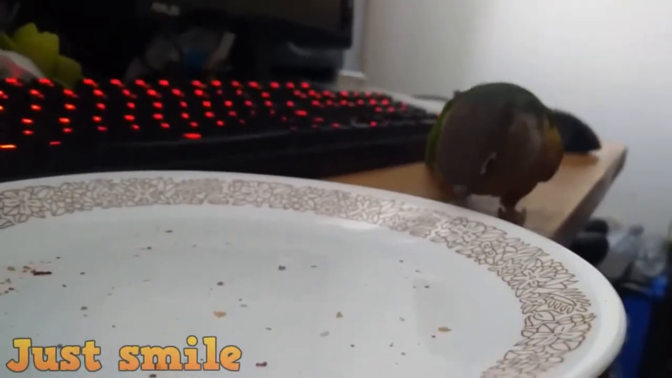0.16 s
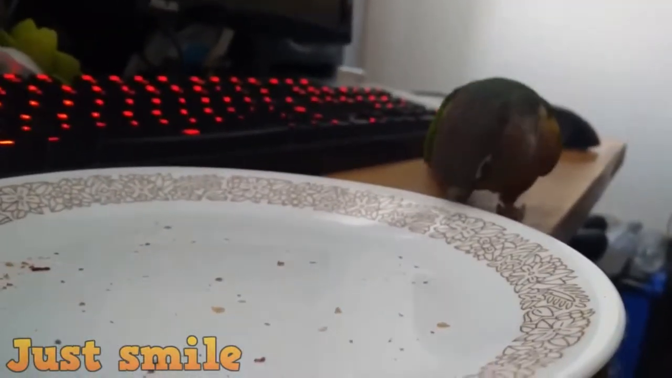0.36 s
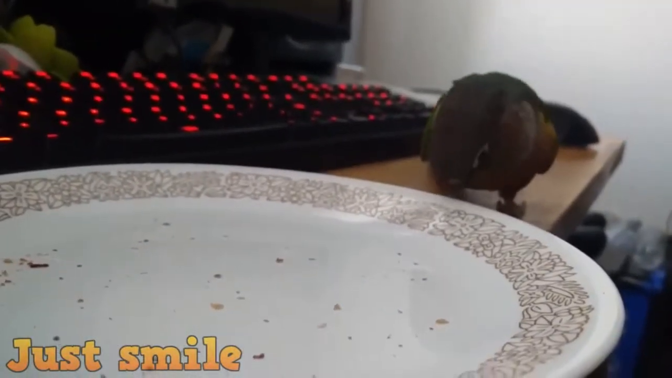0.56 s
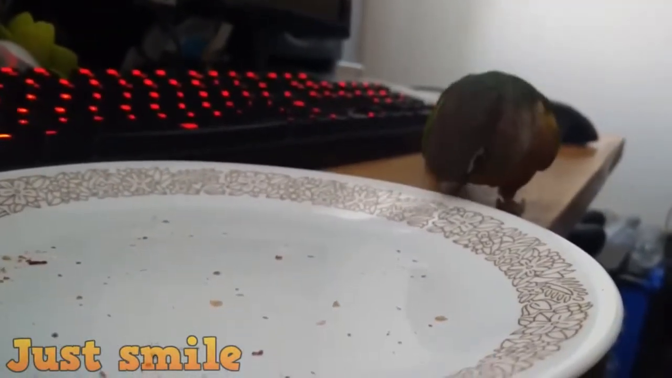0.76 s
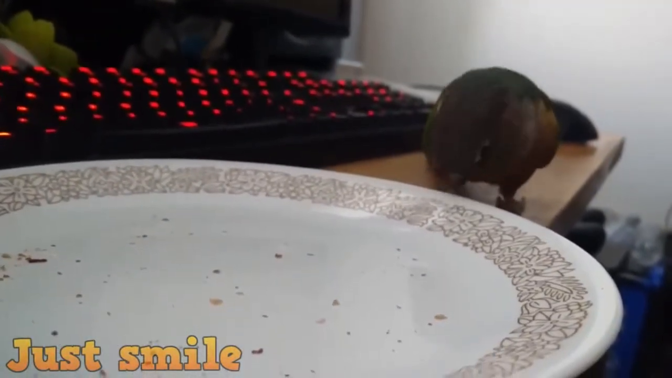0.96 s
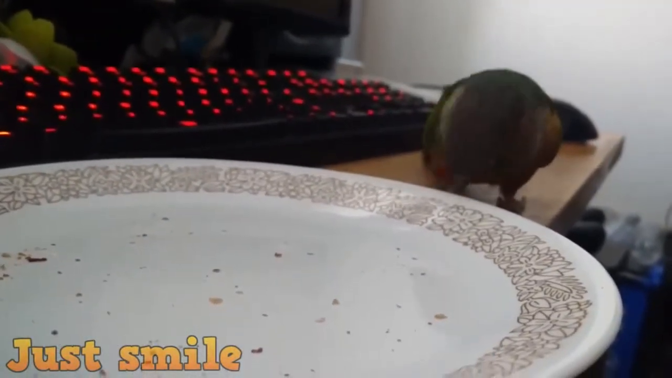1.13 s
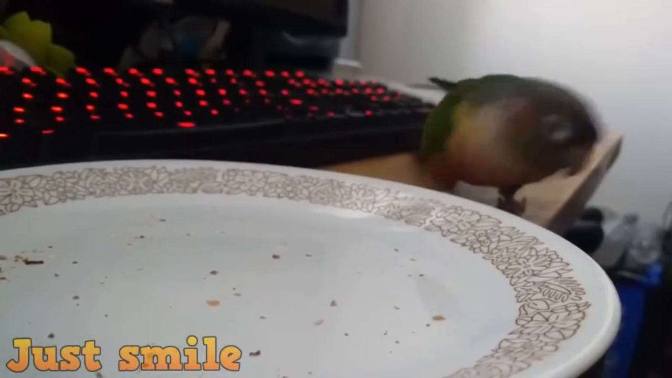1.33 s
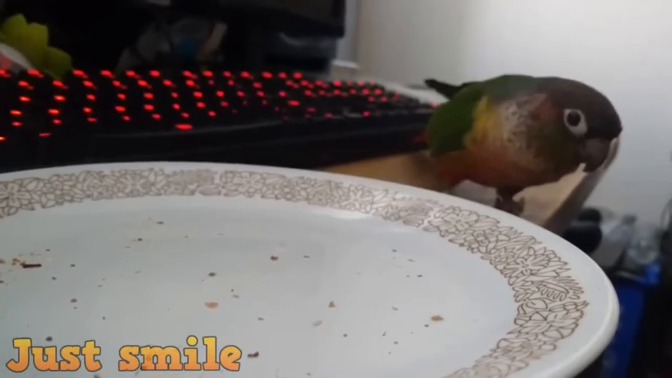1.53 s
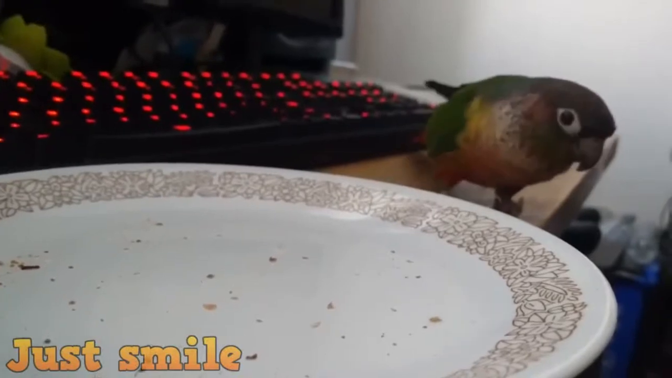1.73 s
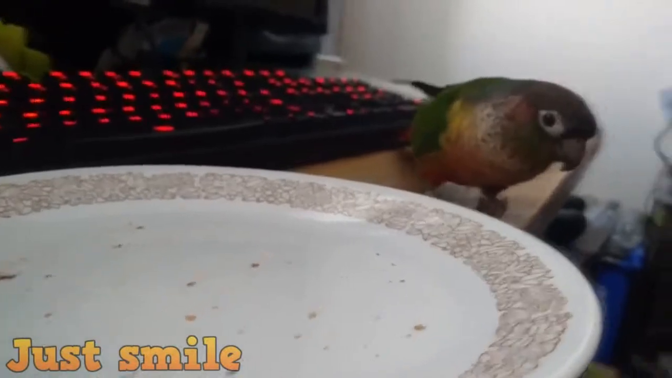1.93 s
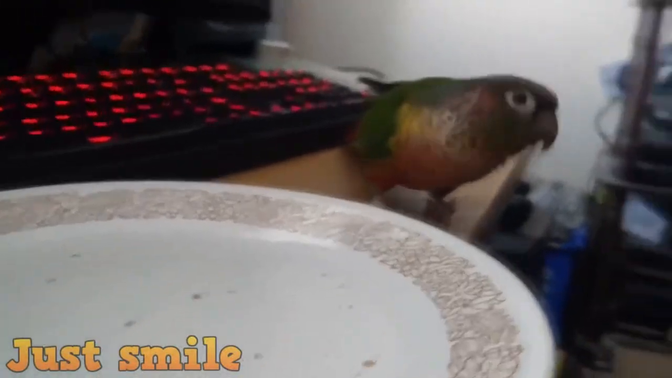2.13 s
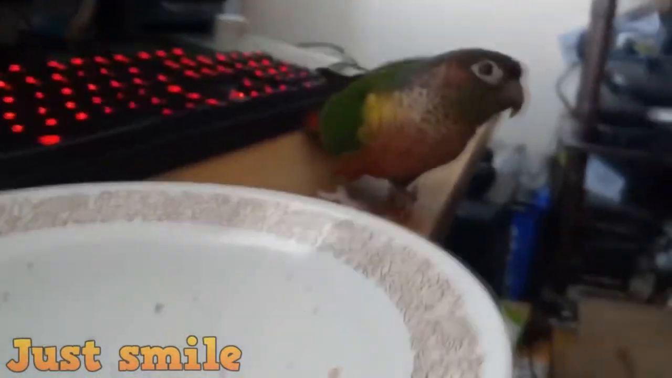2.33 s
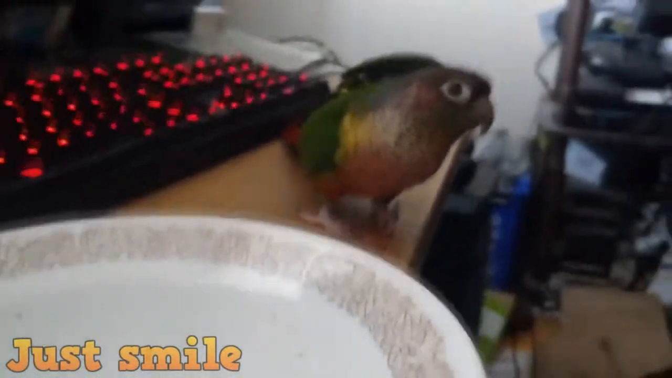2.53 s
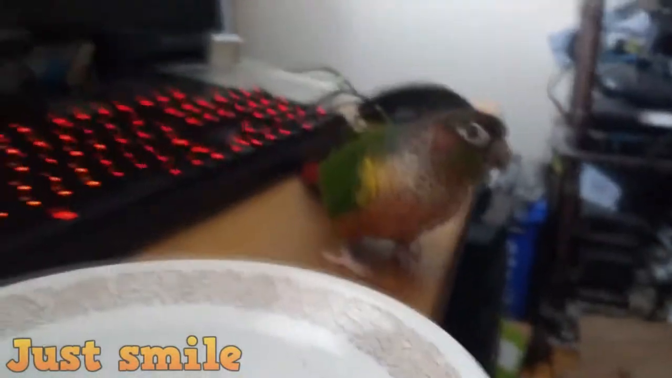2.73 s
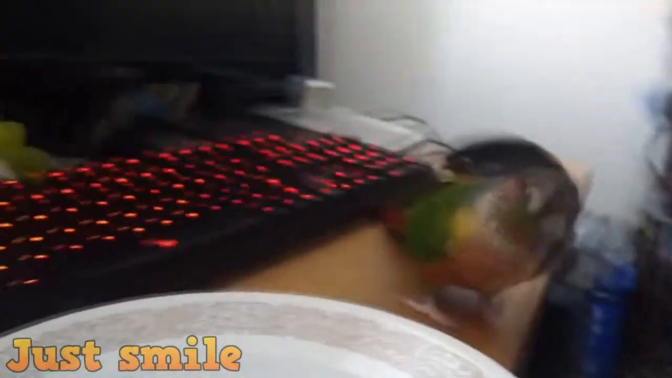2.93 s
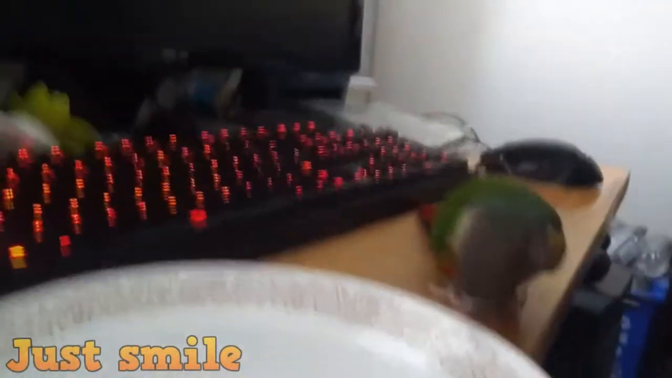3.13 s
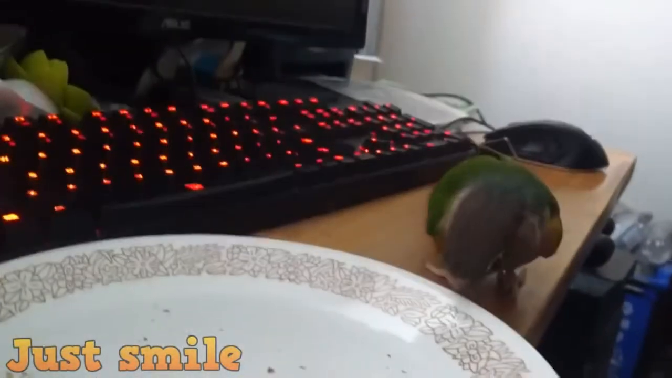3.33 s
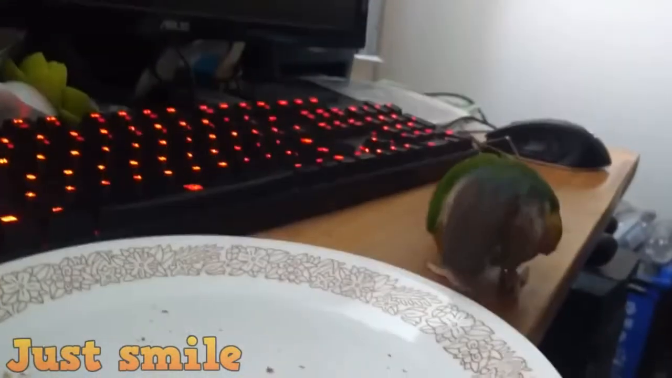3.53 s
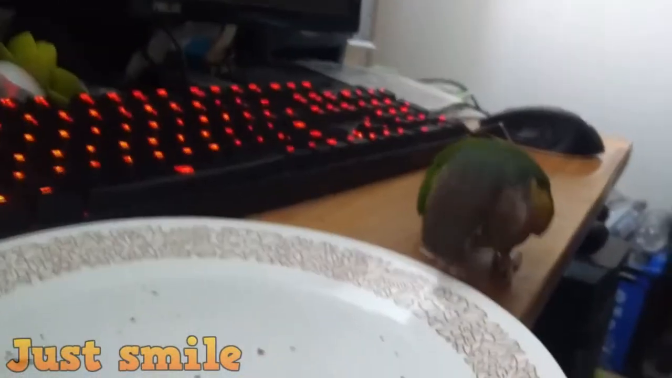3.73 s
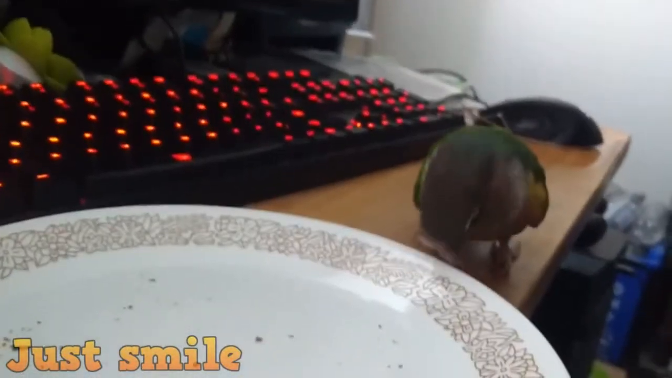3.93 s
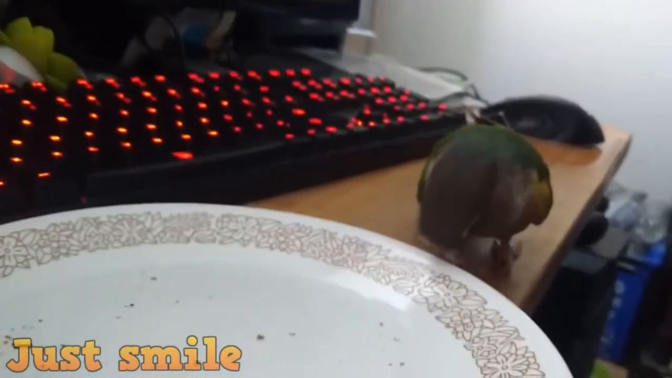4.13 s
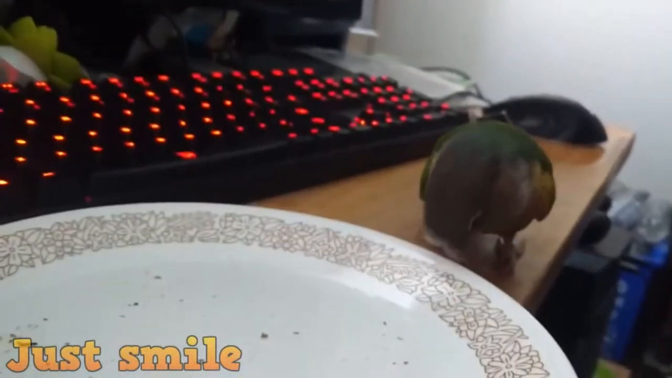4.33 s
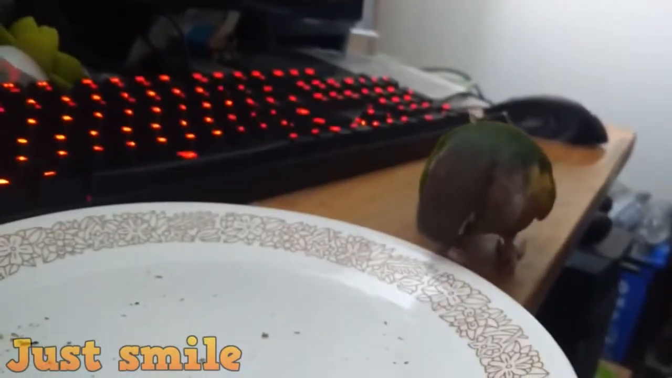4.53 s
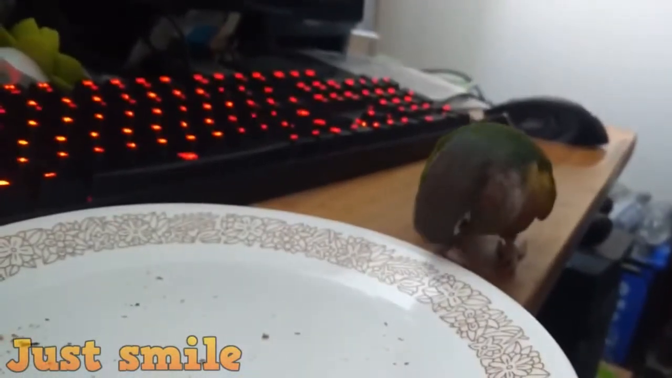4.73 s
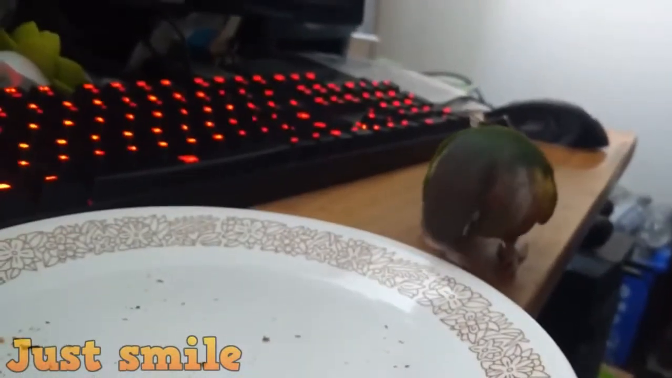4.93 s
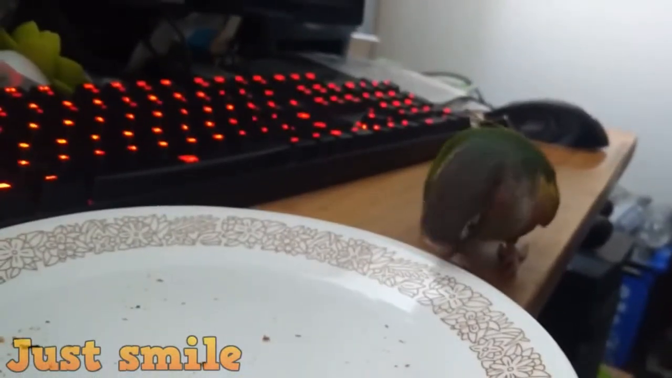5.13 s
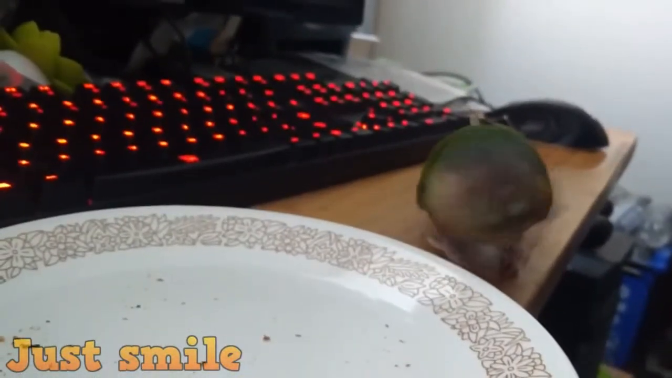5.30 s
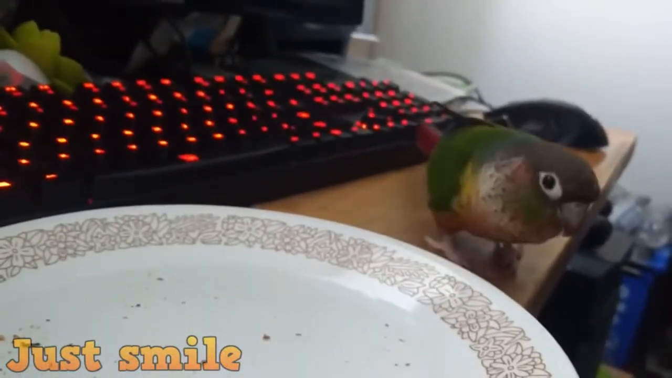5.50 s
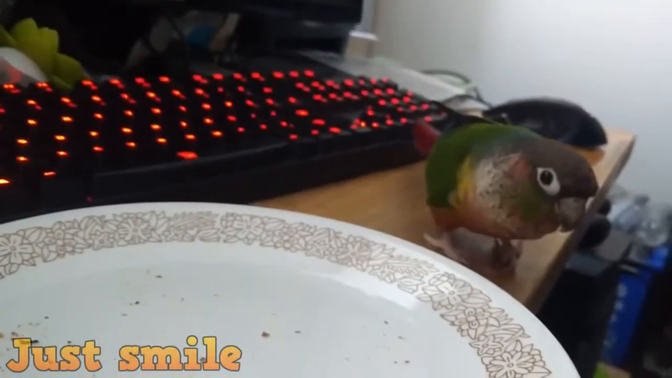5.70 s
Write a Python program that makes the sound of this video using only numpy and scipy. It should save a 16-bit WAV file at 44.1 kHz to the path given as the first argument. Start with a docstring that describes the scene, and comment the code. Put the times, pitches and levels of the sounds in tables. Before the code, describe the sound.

A small parrot raps its beak on a ceramic plate right beside the microphone, about seven taps a second. Each tap is a dry click with a piercing ping and a longer, lower ring. After a pause of about two seconds, a second, longer run starts softly and grows loud. Computer fans hum throughout in the small room, with rushing air, a low rumble and faint hiss.

```python
"""A small parrot raps its beak on a ceramic plate in two runs, right beside the microphone.
Each rap is a dry click with a short, bright splash, a piercing 6 kHz ping and the plate's longer,
lower ring, whose tones change in loudness from rap to rap. The pings overload the recorder's limiter.
Behind it, a computer's fans hum in the small room over rushing air, a low rumble and a faint hiss."""
import sys
import numpy as np
from scipy import signal
from scipy.fft import rfft, irfft
from scipy.io import wavfile
from scipy.ndimage import uniform_filter1d, minimum_filter1d

SR = 44100
rng = np.random.default_rng(int(sys.argv[2]) if len(sys.argv) > 2 else 0)


def generate_wav(sig):
    """Save sig (samples, or channels by samples) to the path in sys.argv[1] as 16-bit PCM at SR."""
    pcm = np.round(np.clip(np.atleast_2d(sig).T, -1, 1) * 32767).astype(np.int16)
    wavfile.write(sys.argv[1], SR, pcm)


N = 254016
TIME = np.arange(N) / SR


def amp(db):
    """Decibels to gain."""
    return 10 ** (np.asarray(db) / 20)


def fade(t, t60):
    """An exponential decay, 60 dB down after t60 seconds."""
    return np.exp(-np.log(1000) * t / t60)


def curve_at(points, hz):
    """Reads a curve on a logarithmic frequency axis."""
    corner_hz, value = np.transpose(points)
    return np.interp(np.log(hz + 1), np.log(corner_hz + 1), value)


def low_cut(hz, order):
    """A Butterworth high-pass filter."""
    return signal.butter(order, hz, "high", fs=SR, output="sos")


def add(mix, start_s, sound):
    """Lays a sound into the mix at a time."""
    part = mix[round(start_s * SR):][:len(sound)]
    part += sound[:len(part)]


def noise(spectrum, size=N):
    """Noise of unit rms, coloured by a spectrum."""
    gain = amp(curve_at(spectrum, np.fft.rfftfreq(size, 1 / SR)))
    coloured = irfft(rfft(rng.standard_normal(size)) * gain, size)
    return coloured / np.sqrt(np.mean(coloured ** 2) + 1e-20)


# Level ride of the hiss, which drops as the microphone turns: (time [s], level [dB])
HISS_RIDE = [(0, -59), (1.5, -64), (2.1, -64), (2.5, -73), (5.7, -67)]

def hiss():
    """A faint, airy band of hiss, brightest near 9.5 kHz."""
    band = noise([(2000, -25), (6000, -7), (9500, 10), (13000, -22)])
    return amp(np.interp(TIME, *np.transpose(HISS_RIDE))) * band


# Colour of the computer's low rumble: (frequency [Hz], relative level [dB])
RUMBLE_SPECTRUM = [(20, -11.5), (42, -34), (57, 2), (75, 2), (87, 4), (105, -4.5), (130, 2), (155, -9.5),
                   (300, -6.5), (600, -32)]
# Colour of the moving air: (frequency [Hz], relative level [dB])
AIR_SPECTRUM = [(150, -12), (260, -1), (400, -3), (850, -6), (1100, -2.5), (1380, -8.5), (1700, -4.5),
                (2100, -8.5), (3400, -8), (4300, -14.5), (5500, -14), (7000, -19), (11000, -35),
                (15500, -44)]
# Level ride of the air as the microphone turns: (time [s], level [dB])
AIR_RIDE = [(0, -44), (1.4, -45), (2.2, -45), (2.7, -47), (5.7, -47)]
# The fans' hum: (frequency [Hz], centre rms level [dB])
FAN_TONES = [(118.4, -54.5), (258.4, -62.5), (425.3, -62.5), (479.1, -55), (511.4, -58), (769.8, -62.5),
             (1026, -66), (1540, -64), (1653, -61)]

def computer(rumble_db=-47, waver_hz=0.69, throb_db=2):
    """The bed: fan tones waver in pitch and level over rushing air and a low rumble."""
    out = amp(rumble_db) * noise(RUMBLE_SPECTRUM)
    out += amp(np.interp(TIME, *np.transpose(AIR_RIDE))) * noise(AIR_SPECTRUM)
    slow = [(4, 0), (40, -60), (200, -150)]
    for hz, db in FAN_TONES:
        drift, throb = noise(slow), noise(slow)
        cycles = np.cumsum(hz + waver_hz * drift) / SR + rng.random()
        out += amp(db + throb_db * throb) * np.sqrt(2) * np.sin(2 * np.pi * cycles)
    return out


# Decay of the small room: (frequency [Hz], t60 [s])
ROOM_DECAY = [(200, 0.84), (2000, 0.25), (6000, 0.19), (15000, 0.2)]

def room(send, build_s=0.0034):
    """A diffuse tail that builds up, then dies faster in the treble than in the bass."""
    hz, t, bands = signal.stft(rng.standard_normal(SR // 2), SR, nperseg=256)
    envelope = (1 - np.exp(-t / build_s)) * fade(t, curve_at(ROOM_DECAY, hz)[:, None])
    tail = signal.istft(bands * envelope, SR, nperseg=256)[1]
    return signal.fftconvolve(send, tail / np.linalg.norm(tail))[:N]


# Colour of the splash on each rap: (frequency [Hz], relative level [dB])
SPLASH_SPECTRUM = [(100, -31), (400, -5), (950, -16.5), (1300, -8), (2400, 1), (3300, 4.5), (4300, 1),
                   (5500, -27), (7000, 11), (8200, -21), (9600, 6), (11500, -32), (16000, -29)]

def rap_splash(force_db, level_db=-17, force_tracking=0.75, t60=0.053):
    """A short, bright splash of noise on each rap, louder for harder blows."""
    t = np.arange(SR // 5) / SR
    return amp(level_db + force_tracking * force_db) * noise(SPLASH_SPECTRUM, len(t)) * fade(t, t60)


# Colour of the beak's contact: (frequency [Hz], relative level [dB])
CLICK_SPECTRUM = [(100, -66), (350, -17), (700, -30), (950, -12), (1250, -13.5), (1800, -3), (2550, -7),
                  (3200, 3.5), (4200, -7.5), (6800, -0.5), (8200, -9.5), (12000, -32), (16000, -27)]

def beak_click(hardness_db, gain_db=15, delay_at_3khz_s=0.000698, size=2048):
    """The dry click of beak on glaze; bending waves bring its bass later than its treble."""
    hz = np.fft.fftfreq(size, 1 / SR)
    log_gain = np.log(amp(curve_at(CLICK_SPECTRUM, abs(hz))))
    minimum_phase = np.exp(np.conj(signal.hilbert(log_gain)))
    phase_lag = 4 * np.pi * delay_at_3khz_s * np.sign(hz) * np.sqrt(3000 * abs(hz))
    click = np.fft.ifft(minimum_phase * np.exp(-1j * phase_lag)).real
    return amp(gain_db + hardness_db) * click


# Loudness pattern of each of CHANGING_TONES along the raps' timbre setting:
# (dip position [timbre 0-1], dip spacing [same scale], gain in a dip [ratio], lift once moved [dB])
TONE_PATTERNS = [(.15, 0.71, 0.07, -2.4), (0.45, 0.5, 0.28, 1.1), (0.038, 0.4495, 0.13, -9.5),
                 (0.536, .55, 0.071, 4.5), (0.86, 1.26, 0.85, -0.5), (0.76, 1.1, 0.77, 1),
                 (.87, 1.02, 0.15, 6), (.99, 1.33, 0.065, -10.5)]

def tone_balance_db(timbre, moved):
    """A rap's timbre setting brings some ringing tones forward and holds others back."""
    dip, spacing, dip_gain, moved_db = np.transpose(TONE_PATTERNS)
    power = np.sin(np.pi * (timbre - dip) / spacing) ** 2 + dip_gain ** 2
    return 10 * np.log10(power) + moved * moved_db


# Tuning of the plate's modes: (frequency [Hz])
MODE_HZ = [935, 1502, 2177, 2967, 3170, 3879, 4860, 4925, 6082, 7368, 7620, 8765, 10261, 10757, 11870,
           12670, 13050, 13585, 14380, 15400, 5565, 6070, 7374]
# Voicing of each mode: (base level [dB], t60 [s], force tracking [dB/dB], twin detune [Hz])
MODE_VOICING = [(-38, 0.21, 0.5, 2), (-36, 1.9, 0.11, 1.56), (-37, 1.2, 0.039, 2.16),
                (-17.5, 0.75, 0.2, 0.35), (-4.5, 0.013, 0.59, 2.8), (-18, 0.27, 0.051, 0.59),
                (-2.5, 0.02, 0.81, 4), (-18, 0.18, 0.52, 15), (6.5, .031, 0.85, 3), (-3.5, 0.042, 0.99, 4),
                (-13.5, 0.021, 0.93, 9.9), (-15, 0.11, 0.64, 23), (-12, 0.088, 0.84, 24),
                (-28.5, 0.071, 1, 5.5), (-30, 0.12, 0.91, 14), (-49, 0.1, 0.75, 7), (-37, 0.089, .4, 9),
                (-41, 0.066, 0.53, 17), (-26, 0.078, 0.85, 12), (-27, 0.053, 0.95, 10),
                (-14.5, 0.039, 0.59, 14), (-55, .22, .4, 14), (-30, 0.096, 0.16, 18)]
# The ringing tones whose loudness changes from rap to rap, 1.5 to 10.3 kHz: (place in MODE_HZ [index])
CHANGING_TONES = [1, 2, 3, 5, 8, 9, 11, 12]

def plate_ring(length_s, force_db, timbre, moved, vary_db=2.1, treble_vary_db=4.5, twin_gain=0.36):
    """One blow starts all the plate's modes: a piercing ping over a longer, lower ring."""
    t = np.arange(round(length_s * SR)) / SR
    hz = np.array(MODE_HZ)
    base_db, t60, tracking, detune_hz = np.transpose(MODE_VOICING)
    level_db = base_db + tracking * force_db
    level_db[CHANGING_TONES] += tone_balance_db(timbre, moved)
    # no two contacts are quite alike
    spread_db = np.where(hz > 10500, treble_vary_db, vary_db * (1 - tracking))
    level_db += spread_db * rng.standard_normal(len(hz))
    polarity = rng.choice([-1, 1], len(hz))
    # a plate is never quite round, so each mode beats with a slightly detuned twin
    modes = np.sin(2 * np.pi * np.outer(hz, t))
    twins = np.sin(2 * np.pi * np.outer(hz + detune_hz, t))
    beating = (modes + twin_gain * twins) / (1 + twin_gain)
    return (polarity * amp(level_db)) @ (beating * fade(t, t60[:, None]))


# Cue list of the two runs: (time [s], force [dB], click hardness [dB], timbre [0-1])
RAP_CUES = [(0.0147, -1, 7, 1), (0.1322, -5.5, 2.5, .51), (0.249, -5.5, 3.5, .07), (0.3708, -8, 1, 0.97),
            (0.5023, -4, 5.5, .5), (0.6387, -1, 10, .45), (0.7714, -4, 5.5, .04), (0.9109, -6, 7, 0.03),
            (1.0495, -3.5, 7, .45), (1.1913, -2.5, 10, 0.62), (3.1663, -22, -32, 0.56),
            (3.2694, -27, -10.5, 0.03), (3.3844, -11, 1, 0.56), (3.5122, -18.5, -9.5, 0.62),
            (3.634, -12, -2, 0.01), (3.7613, -0.5, -5, 0.52), (3.9, -3, -8.5, 0.47),
            (4.0476, -17, -0.5, 0.87), (4.1915, -3.5, 4.5, 1), (4.3356, 2.5, -1.5, .53),
            (4.4722, 0, 1.5, .96), (4.6144, -2, -8, .52), (4.7642, 0.5, 1, .53), (4.9154, -5.5, 5.5, 0.94),
            (5.0604, -1, 5, 0.91), (5.212, -3, -30, 0.51)]

def parrot_raps(plate_moved_s=2.5, radiates_above_hz=800):
    """Each rap chokes the last ring and starts a new one; the plate is shifted between the runs."""
    ring, clicks = np.zeros(N), np.zeros(N)
    ends = [cue[0] for cue in RAP_CUES[1:]] + [N / SR]
    for (start, force_db, hardness_db, timbre), end in zip(RAP_CUES, ends):
        add(ring, start, plate_ring(end - start, force_db, timbre, moved=start > plate_moved_s))
        add(clicks, start, beak_click(hardness_db))
        add(clicks, start, rap_splash(force_db))
    ring = signal.sosfilt(low_cut(radiates_above_hz, order=2), ring)  # the plate radiates no bass
    return ring, clicks


def scene(ring_send_db=-25.5, treble_send_db=-15, click_send_db=-23):
    """Plate and beak up front, over the bed; the highest modes spread furthest into the room."""
    ring, clicks = parrot_raps()
    treble = signal.sosfilt(low_cut(9500, order=6), ring)
    send = amp(ring_send_db) * ring + amp(treble_send_db) * treble + amp(click_send_db) * clicks
    return (ring + clicks + room(send) + computer() + hiss())[None]


def limiter(x, threshold_db=0, hold_s=0.047, release_db_per_s=260):
    """Ducks as soon as the power passes the threshold, holds, then lets the gain back up."""
    power = abs(uniform_filter1d(x ** 2, size=40))
    over_db = np.maximum(10 * np.log10(power + 1e-12) - threshold_db, 0)
    half_hold = round(hold_s * SR / 2)
    held_db = -minimum_filter1d(-over_db, 2 * half_hold + 1, origin=half_hold, mode="constant")
    release_db = TIME * release_db_per_s
    duck_db = np.maximum.accumulate(held_db + release_db) - release_db
    return x * amp(-duck_db)


def record(dry, ceiling=0.74, knee=6, overload_above_hz=900, top_hz=15900):
    """The limiter ducks the loud pings, treble crests are soft-clipped, and the very top is cut."""
    limited = limiter(dry[0])
    oversampled = signal.resample_poly(limited, 4, 1)
    rounded = oversampled / (1 + abs(oversampled / ceiling) ** knee) ** (1 / knee)
    crests = signal.resample_poly(oversampled - rounded, 1, 4)
    clipped = limited - signal.sosfiltfilt(low_cut(overload_above_hz, order=2), crests)
    high_cut = signal.firwin(201, top_hz, window=("kaiser", 8), fs=SR)
    return signal.oaconvolve(clipped, high_cut, "same")[None]


dry = scene()
out = record(dry)
generate_wav(out)
```